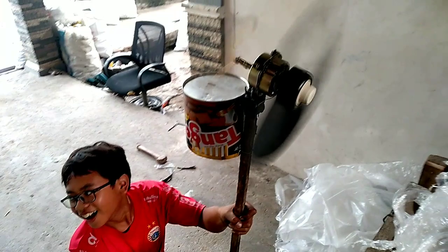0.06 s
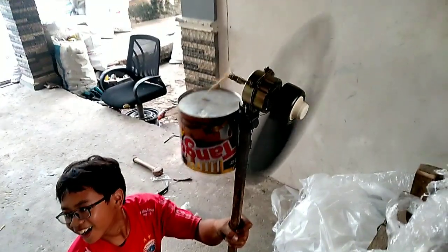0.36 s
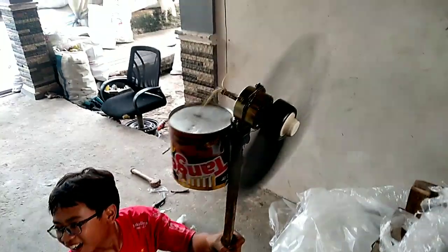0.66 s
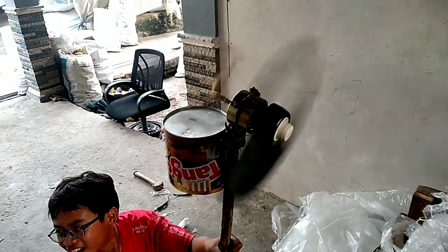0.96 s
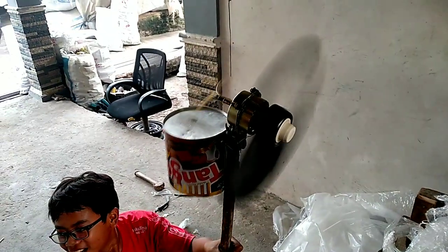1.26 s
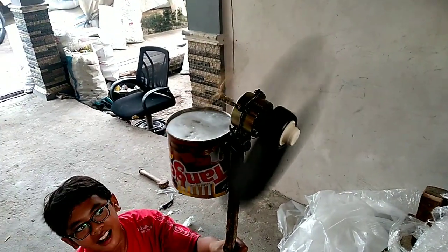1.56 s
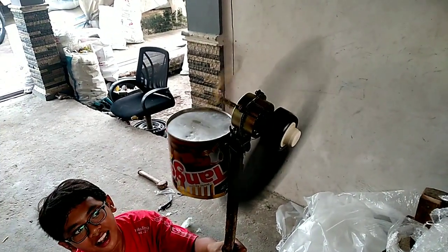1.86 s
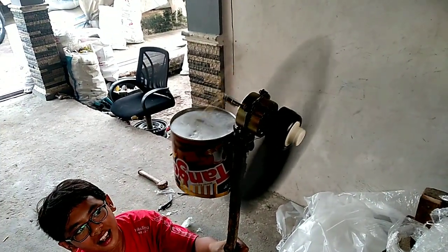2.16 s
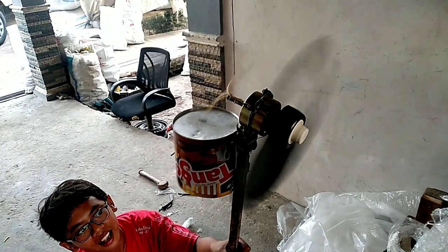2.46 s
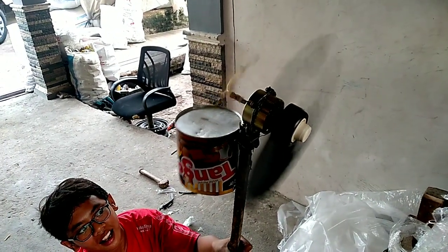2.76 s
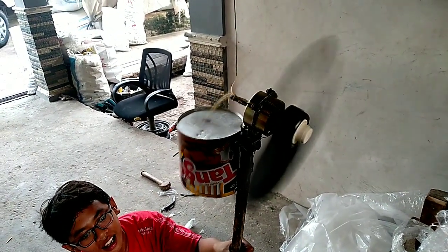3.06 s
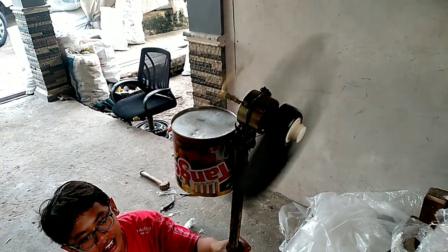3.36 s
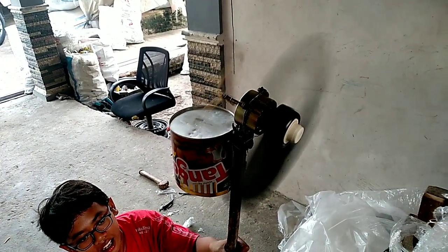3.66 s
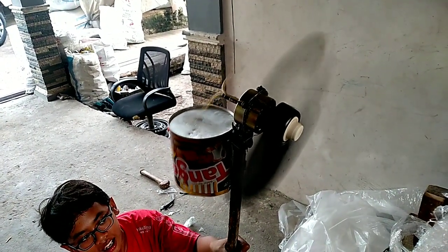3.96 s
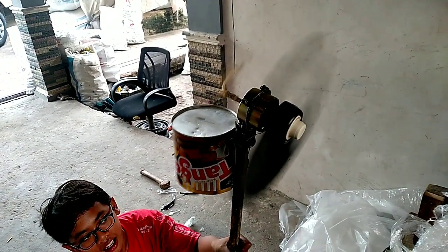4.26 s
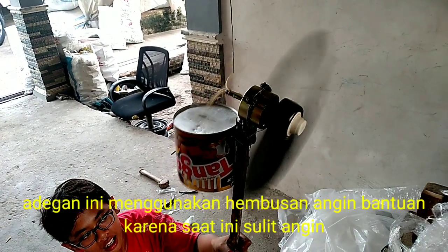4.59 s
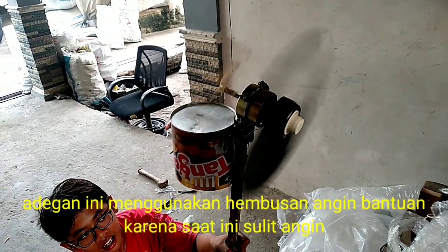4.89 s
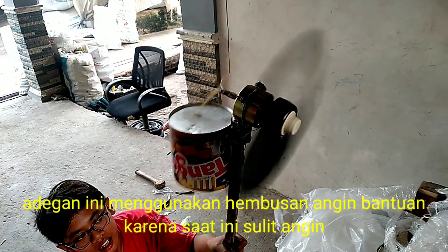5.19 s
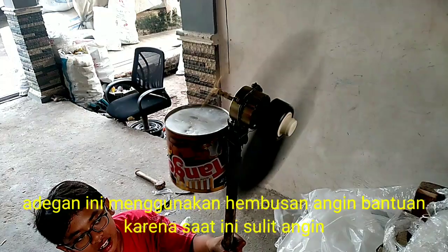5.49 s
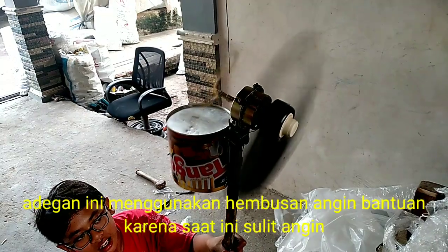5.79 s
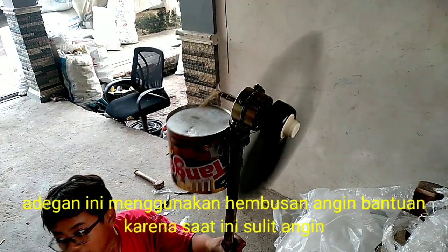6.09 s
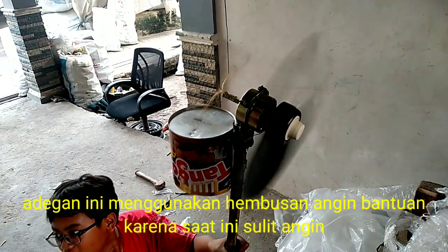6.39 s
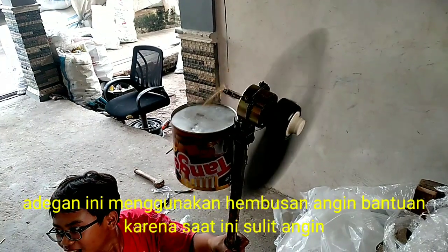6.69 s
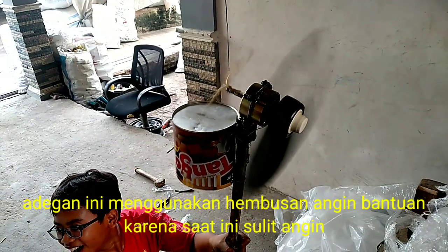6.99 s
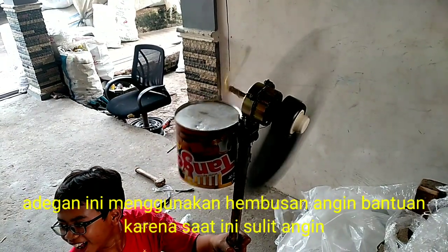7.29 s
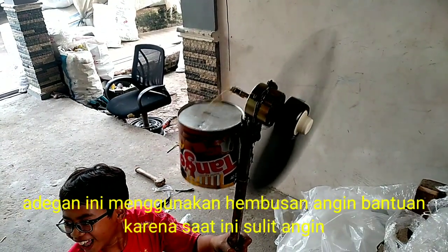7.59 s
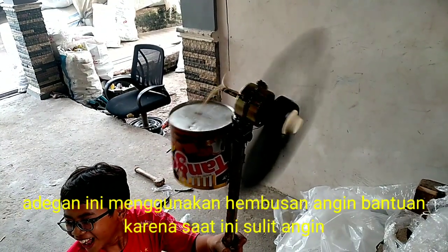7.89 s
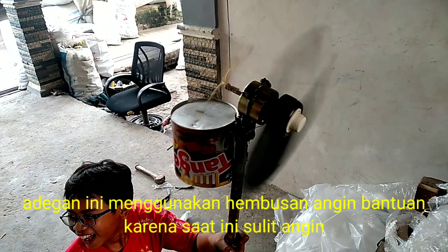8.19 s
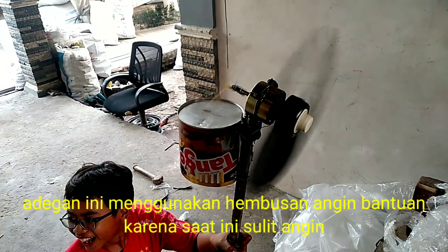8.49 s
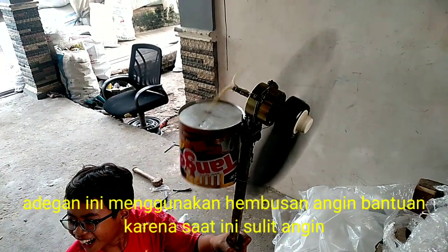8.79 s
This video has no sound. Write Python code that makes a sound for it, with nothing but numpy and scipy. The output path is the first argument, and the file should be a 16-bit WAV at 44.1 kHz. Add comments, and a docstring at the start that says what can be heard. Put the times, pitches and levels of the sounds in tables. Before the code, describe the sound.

Rapid, even slaps ring on a metal tin as spinning blades hiss through the air in a concrete shed.

```python
"""A concrete shed, a stereo microphone pair near a home-made bird scarer spinning in a stream of air.
The rotor makes nearly eight turns a second. Air rushes over the blades all the while and swells
into a swish as the whip comes round. On every turn the whip slaps an upturned tin twice, then skips
and drags over the lid and keeps it ringing. Wall and floor throw the blows back.
Short random pings give the treble a coarse grain."""
import sys
import numpy as np
from scipy import signal
from scipy.fft import rfft, irfft, next_fast_len
from scipy.io import wavfile
from scipy.ndimage import uniform_filter1d, map_coordinates

SR = 44100
rng = np.random.default_rng(int(sys.argv[2]) if len(sys.argv) > 2 else 0)


def int16_out(signal):
    """Quantize to a 16-bit WAV file."""
    q = np.round(np.clip(np.atleast_2d(signal).T, -1, 1) * 32767)
    wavfile.write(sys.argv[1], SR, q.astype(np.int16))


N = 399105
TIME = np.arange(N) / SR

# Speed of the rotor: time_s, turns_per_s
ROTOR_SPEED = [(0.0, 7.714), (0.35, 7.634), (2.57, 7.814), (3.33, 8.011), (4.24, 7.987), (4.84, 7.889),
               (7.19, 7.916), (8.42, 7.542), (9.05, 7.718)]
# The course of one turn: turn_share, swish_db, drag_db
TURN_LEVELS = [(.04, 1.9, -2.5), (.12, 2.1, -3.2), (.18, 1.4, -2.8), (.28, .1, -.6), (.37, -.1, -.3),
               (.45, .4, -.2), (.52, -.3, -1.2), (.7, -2.1, .5), (.78, -2.3, .3), (.92, -1.8, .8),
               (.975, 2, -2.2)]
# Where the noises sit between the microphones: pitch_hz, left_over_right_db
MIC_BALANCE = [(60, -2), (110, 6), (200, -15), (380, 15), (700, -5.5), (1290, -7), (2300, 9), (3100, 8.5),
               (4400, -10.5), (5100, -1), (6200, -2.5), (8120, -1.5), (15000, 2.5)]
# How alike the two microphones hear them: pitch_hz, correlation (clipped to -1..1)
MIC_LIKENESS = [(40, -1.4), (130, 1), (450, 0.82), (800, 1), (1300, 0.35), (2500, -0.26), (8000, -0.056)]
# Spectrum of the air over the blades: pitch_hz, level_db
AIR_SPECTRUM = [(1500, -18.5), (2300, -4), (3050, -11.5), (4100, -4.5), (4650, -6), (5300, -2.5),
                (6000, -1.5), (7000, 3), (8000, 4), (9200, 3.5), (10000, 0.5), (11000, -1.5), (12400, -8.5),
                (14400, -14.5), (15400, -16)]
# Modes of the tin: pitch_hz, width_hz, struck_db, dragged_db, left_over_right_db
TIN_MODES = [(264.5, 19, -11, -3.5, 0.5), (290.1, 9.2, -6.5, 2, 0), (402.4, 19, 1, -1.5, 0),
             (430.2, 6.9, 5, 2.5, 5), (453.8, 8.2, 6, 6.8, -2), (476.4, 13.6, 0.5, -4, 0),
             (493.4, 8.8, 0, 3, 12), (527.6, 10.4, 3.5, -4.5, -7), (591.6, 20, -4, -20, 3),
             (730, 41, -4.5, -23, 3.5), (824, 20, -12, -17.5, 7), (885, 22, -7, -20, 8),
             (960, 790, -21.5, -13, 8), (1311, 26, -7, -10, 11), (1481, 36.5, -9.5, 1.6, 7),
             (1622, 27, -9, -8.5, 12), (2033, 80, -2.5, 0, 3), (2182, 93, -8, -3.5, 8.5),
             (2340, 52, -20, 0, 1.5), (2692, 72, -20, -2, -1.5), (2910, 31, -19, -3.5, 2),
             (3223, 110, -4, -7, -6), (3554, 73, 9, -6, -7), (3984, 61, -14, -3.5, -1.5),
             (4230, 125, -9, -5.5, 1)]
# Borders of the tin's low note, hollow ring, middle, bright and top modes: pitch_hz
MODE_BORDERS_HZ = [200, 340, 515, 1850, 2480, 7000]
# The whip rebounds from the lid between contacts: turn_share, half_length_share, pressure_loss_db
WHIP_REBOUNDS = [(.155, .085, 12), (.315, .035, 7), (.52, .06, 9), (.68, .025, 3), (.83, .025, 2.5),
                 (.955, .03, 2.5)]
# The hollow ring swells briefly: time_s, rise_db (before HOLLOW_DEPTH)
HOLLOW_SWELLS = [(0.26, 7.5), (0.5, 6), (0.75, 1.5), (1.12, 7), (1.26, 4.5), (1.45, 4.5), (1.76, 5.5),
                 (2.15, 12), (2.28, 6), (2.69, 8), (3.05, 5), (3.33, 8.5), (3.92, 7.5), (4.04, 6),
                 (4.56, 4), (4.8, 7.5), (4.94, 6.5), (5.19, 3), (5.6, 5.5), (5.73, 3), (5.82, 5.0),
                 (6.07, 4), (6.45, 5), (6.57, 6), (7.25, 5), (7.5, 6), (7.76, 10), (8.09, 8.5), (8.23, 6),
                 (8.39, 5), (8.51, 5), (9.02, 8)]
# The low note swells: time_s, rise_db (before LOW_DEPTH)
LOW_NOTE_SWELLS = [(0.59, 17), (0.75, 14), (1.22, 12), (1.38, 13), (1.69, 16), (1.95, 6), (2.4, 18),
                   (2.52, 19), (3.28, 23), (3.69, 10), (4.02, 11), (4.16, 15), (4.39, 23), (4.55, 14),
                   (4.7, 7), (5.32, 18), (5.94, 10), (6.07, 17), (6.2, 3), (7.07, 17), (7.34, 26),
                   (7.72, 14), (7.97, 13), (8.22, 15), (8.49, 14), (8.89, 8)]
# The bright ring near 2 kHz flares: time_s, rise_db (before BRIGHT_DEPTH or CLANG_DEPTH)
BRIGHT_FLARES = [(0.11, 2), (0.73, 9), (0.9, 6), (2.92, 8), (3.09, 8), (3.49, 10), (4.06, 3.5), (4.23, 5),
                 (4.95, 8), (6.13, 9), (6.39, 10), (6.5, 6), (6.68, 4), (6.9, 2), (7.16, 15), (7.54, 13),
                 (8.15, 11), (8.27, 6), (8.54, 7), (8.84, 10)]
# Spectrum of the dragging whip's rustle: pitch_hz, level_db
RUSTLE_SPECTRUM = [(30, -71), (100, -23), (190, -17), (260, -24), (500, 10), (800, 11.5), (1150, -0.5),
                   (1800, 18.5), (2500, -8), (3200, 3), (6000, 11.5), (15000, -34)]
# Spectrum of the coarse treble grain: pitch_hz, level_db
GRAIN_SPECTRUM = [(2400, -0.5), (2750, 1), (3100, -5), (3500, 0.5), (4200, 1.5), (4650, 0), (5150, 0),
                  (5600, 2), (6800, 0.5)]
# Where the whip skips on the lid in every turn: turn_share
SKIP_SHARES = [.24, .59, .73, .862]
# How hard each of those skips lands: level_db
SKIP_LEVELS_DB = [-31, -26.5, -23.5, -28]
# The tip chatters after each slap: turn_share, level_db
CHATTER_CONTACTS = [(.008, -23.5), (.365, -25)]
# Spectrum of that chatter: pitch_hz, level_db
CHATTER_SPECTRUM = [(400, -25), (750, -2), (1300, -2), (2100, -4), (3000, -13), (6000, -15), (12000, -30)]
# Echoes from the near wall and floor: delay_s, level_db
NEAR_ECHOES = [(.0028, -15), (.0047, -14), (.0066, -11)]

AIR_DB, DRAG_DB, RUSTLE_DB, GRAIN_DB = -19.5, -22.5, -32, -26.1
# Share of the listed rise that reaches each range of modes, and the clang of a blow
HOLLOW_DEPTH, LOW_DEPTH, BRIGHT_DEPTH, CLANG_DEPTH = .9, .5, .45, .4


def from_db(db):
    """Decibels to gain."""
    return 10 ** (np.asarray(db) / 20)


def unit_rms(x):
    """Scale to unit power."""
    return x / np.sqrt(np.mean(x ** 2) + 1e-20)


def at_hz(points, hz):
    """Read a table on a log-frequency axis."""
    pitch_hz, value = np.transpose(points)
    return np.interp(np.log(np.maximum(hz, 1)), np.log(pitch_hz), value)


def pan(left_over_right_db):
    """Gains at the left and right microphones."""
    return from_db(np.array([[.5], [-.5]]) * left_over_right_db)


def delay(x, delay_s):
    """The same sound, arriving later."""
    return np.pad(x, ((0, 0), (round(delay_s * SR), 0)))[:, :N]


def drift(per_s):
    """A smooth random wander of rms 1."""
    knots, coarse_s = rng.standard_normal(8192), TIME[::32]
    wander = map_coordinates(knots, [coarse_s * per_s], order=2, mode="wrap")
    return unit_rms(np.interp(TIME, coarse_s, wander))


def bump(x, centre, width):
    """A smooth hump of height 1."""
    return np.exp(-((x - centre) / width) ** 2)


def resonate(x, hz, width_hz):
    """Two-pole resonance with gain 1 at its peak."""
    radius = np.exp(-np.pi * width_hz / SR)
    feedback = [1, -2 * radius * np.cos(2 * np.pi * hz / SR), radius ** 2]
    return signal.lfilter(np.array([1, 0, -1]) * (1 - radius ** 2) / 2, feedback, x + 1e-18)


def roll_off(x, hz, kind="low", order=2):
    """Butterworth low- or high-pass."""
    return signal.sosfilt(signal.butter(order, hz, kind, fs=SR, output="sos"), x)


def spread(mid, side, hz):
    """Mix two unrelated noises into left and right, as alike as the microphones hear that pitch."""
    alike = np.clip(at_hz(MIC_LIKENESS, hz), -1, 1)
    return np.sqrt(1 + alike) * mid + np.sqrt(1 - alike) * side * [[1], [-1]]


def stereo_noise(spectrum):
    """Coloured noise of rms 1, alike at both microphones in the low mids and diffuse in the treble."""
    size = next_fast_len(N)
    hz = np.fft.rfftfreq(size, 1 / SR)
    white = spread(*rfft(rng.standard_normal((2, size))), hz)
    coloured = white * from_db(at_hz(spectrum, hz)) * pan(at_hz(MIC_BALANCE, hz))
    return unit_rms(irfft(coloured, size)[:, :N])


def flutter(x, band_hz, per_s, depth_db=3.7):
    """Narrow bands swell and fade on their own, which coarsens a hiss."""
    hz, frame_s, frames = signal.stft(x, SR, nperseg=1024)
    grid = np.meshgrid(hz / band_hz, frame_s * per_s, indexing="ij")
    knots = rng.standard_normal((2, 256, 512))
    wander = np.array([map_coordinates(side, grid, order=1, mode="wrap") for side in knots])
    return signal.istft(frames * from_db(depth_db * unit_rms(wander)), SR)[1][:, :N]


def rotor_turns(first_slap_s=.0165):
    """Turns the rotor has made since the first slap."""
    turned = np.cumsum(np.interp(TIME, *np.transpose(ROTOR_SPEED))) / SR
    return turned - np.interp(first_slap_s, TIME, turned)


def air_rush(swish_db):
    """Turbulent hiss off the blades; the passing whip lifts its top far more than its body."""
    size = next_fast_len(N)
    hz = np.fft.rfftfreq(size, 1 / SR)
    hiss_spectrum = rfft(stereo_noise(AIR_SPECTRUM), size)
    swell_db = swish_db + .25 * drift(per_s=30)
    centres_hz, swell_depths = [4200, 7200, 9800, 14500], [.03, .55, 1.0, 1.4]
    rush = 0
    for weights, depth in zip(np.eye(len(centres_hz)), swell_depths):
        band = irfft(hiss_spectrum * np.interp(hz, centres_hz, weights))[:, :N]
        rush = rush + band * from_db(depth * swell_db)
    return from_db(AIR_DB) * unit_rms(rush)


def swelling(swells, half_length_s=.04):
    """Short swells as a level in dB about its mean."""
    level_db = sum(rise_db * bump(TIME, time_s, half_length_s) for time_s, rise_db in swells)
    return level_db - level_db.mean()


def lid_pressure(turns, hollow_db):
    """The whip's pressure on the lid, in dB, dips at each rebound; the dips are shallower in a swell."""
    loss_db = sum(db * bump(turns % 1, share, width) for share, width, db in WHIP_REBOUNDS)
    return -loss_db * from_db(-np.maximum(hollow_db, 0))


def rubbed_modes(force, low_hz, high_hz, wander_db=1.9):
    """Friction drives one range of the tin's modes; each comes and goes as the contact point wanders."""
    ring = 0
    for hz, width_hz, _, dragged_db, lean_db in TIN_MODES:
        if low_hz <= hz < high_hz:
            grip = from_db(wander_db * drift(per_s=24))
            friction = force * grip * spread(*rng.standard_normal((2, N)), hz)
            ring = ring + from_db(dragged_db) * pan(lean_db) * resonate(friction, hz, width_hz)
    return ring


def hold_steady(x, window_s=.11):
    """Even out the slow level of a sound."""
    power = np.mean(x ** 2, axis=0)
    return x * np.sqrt(power.mean() / (uniform_filter1d(power, int(window_s * SR)) + 1e-12))


def metal_flex(x, pitch_share=.004):
    """The thin metal flexes under the whip, so its pitch wavers."""
    position = np.arange(N) + np.cumsum(pitch_share * drift(per_s=28))
    return np.array([map_coordinates(side, [position], order=2, mode="mirror") for side in x])


def whip_drag(drag_db, pressure_db, hollow_db, flare_db):
    """Friction rustles and keeps the tin ringing: a low note, a hollow ring and bright modes above."""
    force = from_db(drag_db + .7 * drift(per_s=70))
    ranges_hz = zip(MODE_BORDERS_HZ, MODE_BORDERS_HZ[1:])
    low, hollow, middle, bright, top = [rubbed_modes(force, *span) for span in ranges_hz]
    low_note = hold_steady(low) * from_db(LOW_DEPTH * swelling(LOW_NOTE_SWELLS))
    hollow_ring = hold_steady(hollow) * from_db(hollow_db)
    drum = roll_off((low_note + hollow_ring) * from_db(pressure_db), 210, "high")
    metal = metal_flex(middle + top + bright * from_db(BRIGHT_DEPTH * flare_db))
    rustle = force * flutter(stereo_noise(RUSTLE_SPECTRUM), band_hz=90, per_s=34)
    return from_db(DRAG_DB) * unit_rms(drum + metal) + from_db(RUSTLE_DB) * rustle


def treble_grain(drag_db, pings_per_s=320, t60_s=.11):
    """Coarse treble grain: short random pings between 2.4 and 6.8 kHz, scattered left and right."""
    starts = np.flatnonzero(rng.random(N) < pings_per_s / SR)
    pitch_share, bearing = rng.random((len(starts), 2)).T
    low_hz, high_hz = GRAIN_SPECTRUM[0][0], GRAIN_SPECTRUM[-1][0]
    pitches_hz = low_hz + pitch_share * (high_hz - low_hz)
    strength = from_db(at_hz(GRAIN_SPECTRUM, pitches_hz) + .5 * drag_db[starts])
    mic_gains = strength * np.array([np.cos(2 * np.pi * bearing), np.sin(2 * np.pi * bearing)])
    t = TIME[:int(t60_s * SR / 2)]
    fade = from_db(-60 * t / t60_s)
    grain = np.zeros((2, N + len(t)))
    for start, hz, gains in zip(starts, pitches_hz, mic_gains.T):
        grain[:, start:start + len(t)] += np.outer(gains, fade * np.sin(2 * np.pi * hz * t))
    return from_db(GRAIN_DB) * unit_rms(grain[:, :N])


def each_turn(turns, share, level_db, scatter_db, jitter_s):
    """Times and levels of a contact that comes at nearly the same angle in every turn."""
    marks = np.arange(np.ceil(turns[-1])) + share
    lateness, strength = rng.standard_normal((len(marks), 2)).T
    times = np.interp(marks, turns, TIME, right=2 * TIME[-1]) + jitter_s * lateness
    return times, level_db + scatter_db * strength


def impulses(times, levels_db):
    """One impulse for each contact."""
    train = np.zeros(N)
    starts = np.round(times * SR).astype(int)
    inside = (starts >= 0) & (starts < N)
    train[starts[inside]] = from_db(levels_db)[inside]
    return train


def lid_snap(times, levels_db, hz, width_hz=900, lean_db=3):
    """The lid snaps inwards under the whip: a dead pulse, a hard crack when its band is wide."""
    pulse = resonate(impulses(times, levels_db), hz, width_hz)
    return -resonate(pulse, hz, width_hz) * pan(lean_db)


def lid_strike(times, levels_db, flare_db, contact_hz, slap_hz, width_hz, slap_db, ring_db, vary_db):
    """Blows on the lid: a dead slap as it gives way, then its modes, a little different each time."""
    blows = lid_snap(times, levels_db + slap_db, slap_hz, width_hz, lean_db=2)
    variation = rng.uniform(-1.18, 1, (len(times), len(TIN_MODES)))
    clang_db = CLANG_DEPTH * np.interp(times, TIME, flare_db)
    for k, (hz, mode_width_hz, struck_db, _, lean_db) in enumerate(TIN_MODES):
        is_bright = MODE_BORDERS_HZ[3] <= hz < MODE_BORDERS_HZ[4]
        mode_db = ring_db + struck_db + vary_db * variation[:, k] + is_bright * clang_db
        blows = blows - resonate(impulses(times, levels_db + mode_db), hz, mode_width_hz) * pan(lean_db)
    # A longer, softer contact leaves the high modes quiet.
    return roll_off(roll_off(blows, contact_hz), 180, "high")


def sharp_slap(turns, flare_db):
    """The whip lands at the start of each turn: a short, bright contact with a crack."""
    times, levels_db = each_turn(turns, share=0, level_db=-19.4, scatter_db=.6, jitter_s=.00036)
    body = lid_strike(times, levels_db, flare_db, contact_hz=2460, slap_hz=643, width_hz=480,
                      slap_db=33, ring_db=38.5, vary_db=1.5)
    crack = lid_snap(times, levels_db + 26, hz=1400)
    return body + crack


def tip_chatter(turns, decay_s=.0055):
    """After each slap the whip's tip buzzes on the metal for a few milliseconds."""
    contacts = [each_turn(turns, share, db, scatter_db=2, jitter_s=.0003)
                for share, db in CHATTER_CONTACTS]
    taps = impulses(*np.hstack(contacts))
    envelope = signal.lfilter([1], [1, -np.exp(-1 / (decay_s * SR))], taps + 1e-18)
    return envelope * stereo_noise(CHATTER_SPECTRUM)


def shed_echoes(x, t60_s=.25, tail_db=-9):
    """The direct sound, echoes from the near wall and floor, then a short diffuse tail."""
    t = TIME[:SR // 2]
    mid, side = rng.standard_normal((2, len(t)))
    diffuse = mid + roll_off(side, 1350, "high", order=1) * [[1], [-1]]
    tail = diffuse * from_db(-60 * t / t60_s) * (t > .008)
    tail = tail / np.sqrt(np.sum(tail ** 2) / 2)
    near = sum(from_db(db) * delay(x, delay_s) for delay_s, db in NEAR_ECHOES)
    return x + near + from_db(tail_db) * signal.fftconvolve(x, tail, axes=1)[:, :N]


def soft_skips(turns, hollow_db, flare_db):
    """The whip skips over the lid as it slides off; the skips are louder during a swell."""
    contacts = [each_turn(turns, share, db, scatter_db=1.5, jitter_s=.001)
                for share, db in zip(SKIP_SHARES, SKIP_LEVELS_DB)]
    times, levels_db = np.hstack(contacts)
    levels_db = levels_db + np.interp(times, TIME, hollow_db)
    return lid_strike(times, levels_db, flare_db, contact_hz=565, slap_hz=444, width_hz=130,
                      slap_db=40, ring_db=27.5, vary_db=7)


def heavy_slap(turns, flare_db):
    """The whip lands again about a third of a turn on: a longer contact that rings the tin harder."""
    times, levels_db = each_turn(turns, share=.36, level_db=-21.7, scatter_db=.5, jitter_s=.000768)
    body = lid_strike(times, levels_db, flare_db, contact_hz=1450, slap_hz=820, width_hz=650,
                      slap_db=31.3, ring_db=43, vary_db=4)
    crack = lid_snap(times, levels_db + 28, hz=1300)
    return body + crack


def scene():
    """Air, drag and blows at the microphones, all timed by the one rotor."""
    turns = rotor_turns()
    shares, turn_swish_db, turn_drag_db = np.transpose(TURN_LEVELS)
    swish_db = np.interp(turns, shares, turn_swish_db, period=1)
    drag_db = np.interp(turns, shares, turn_drag_db, period=1)
    hollow_db = HOLLOW_DEPTH * swelling(HOLLOW_SWELLS)
    flare_db = swelling(BRIGHT_FLARES)
    slaps = sharp_slap(turns, flare_db) + heavy_slap(turns, flare_db)
    blows = shed_echoes(slaps + soft_skips(turns, hollow_db, flare_db)) + tip_chatter(turns)
    drag = whip_drag(drag_db, lid_pressure(turns, hollow_db), hollow_db, flare_db)
    clatter = blows + drag + treble_grain(drag_db)
    # The clatter reaches the left microphone a little later.
    clatter = np.vstack([delay(clatter[:1], delay_s=.00007), clatter[1:]])
    return clatter + flutter(air_rush(swish_db), band_hz=115, per_s=38)


def record(dry):
    """The top is cut steeply above 15.5 kHz."""
    return signal.sosfilt(signal.ellip(12, .1, 90, 15500, fs=SR, output="sos"), dry)


dry = scene()
out = record(dry)
int16_out(out)
```